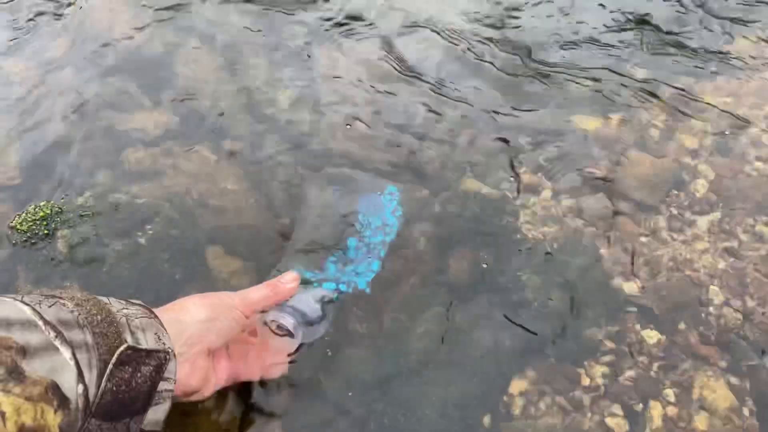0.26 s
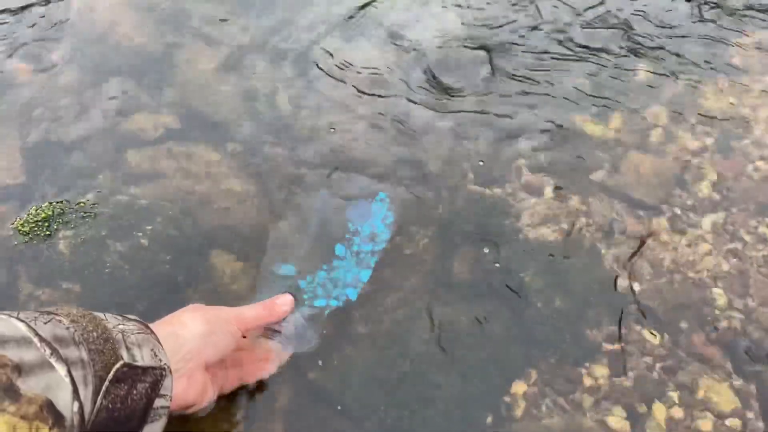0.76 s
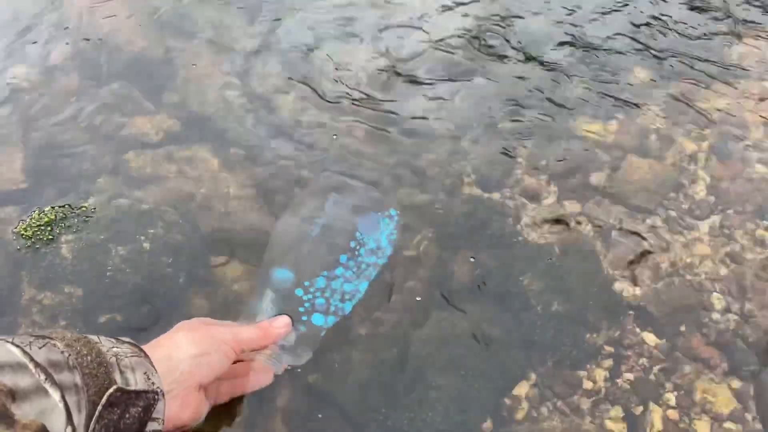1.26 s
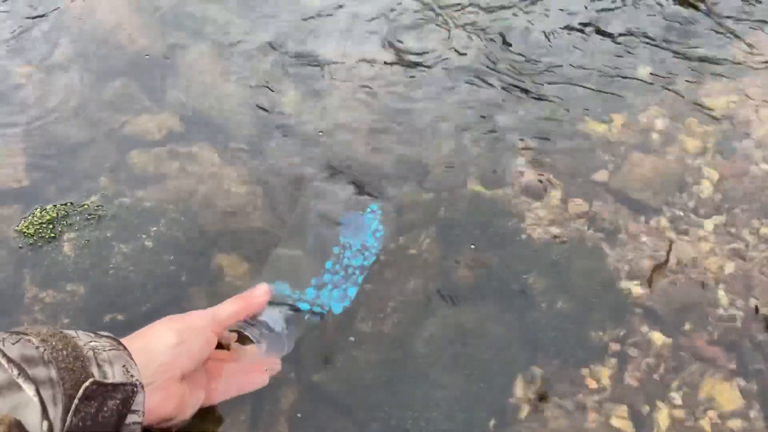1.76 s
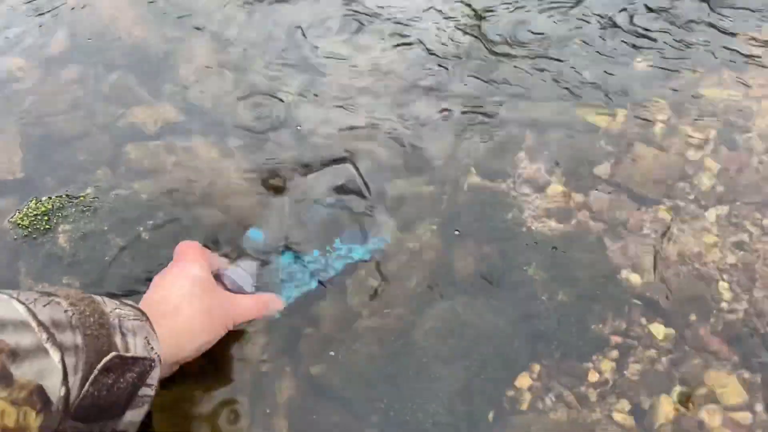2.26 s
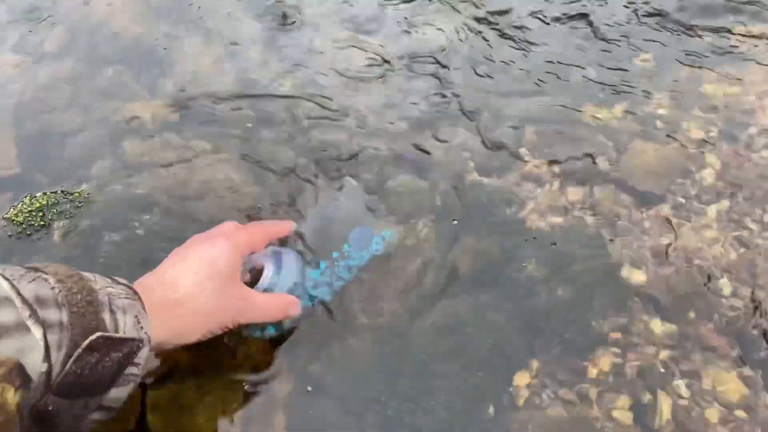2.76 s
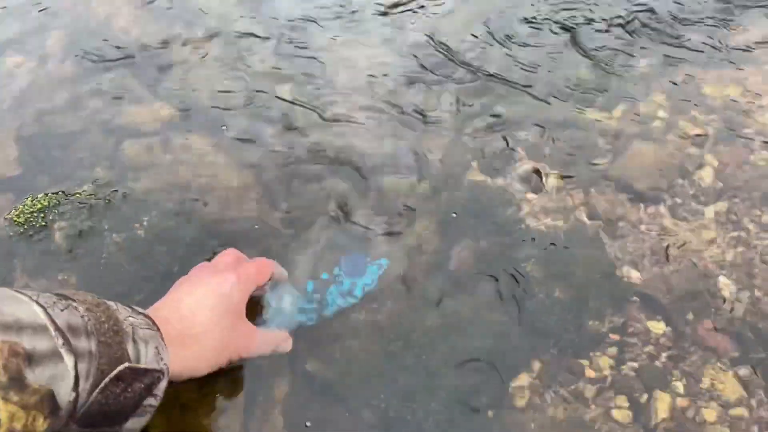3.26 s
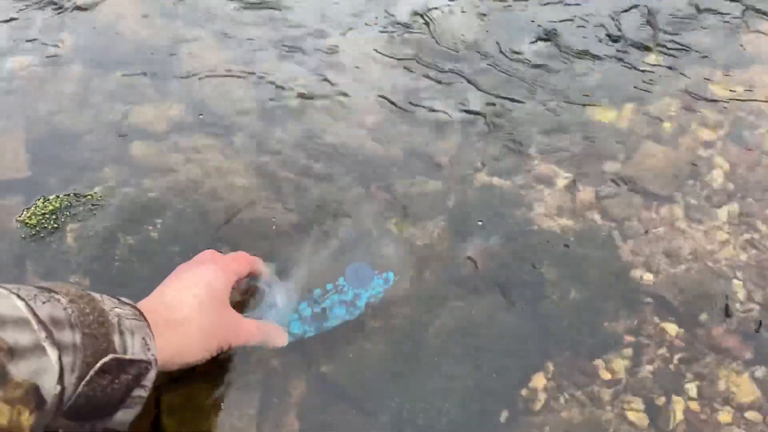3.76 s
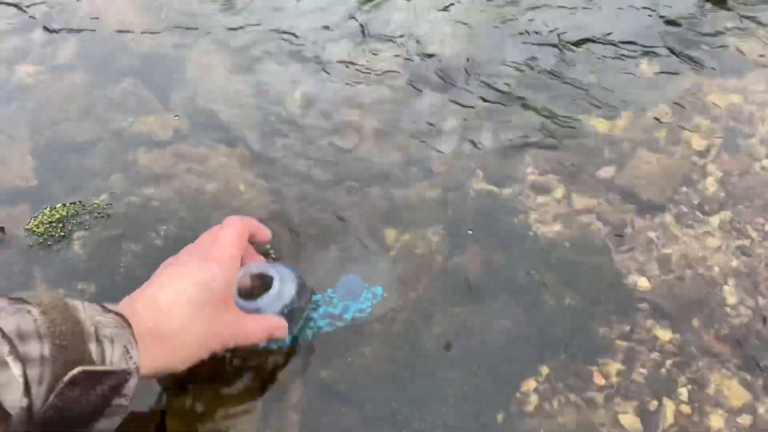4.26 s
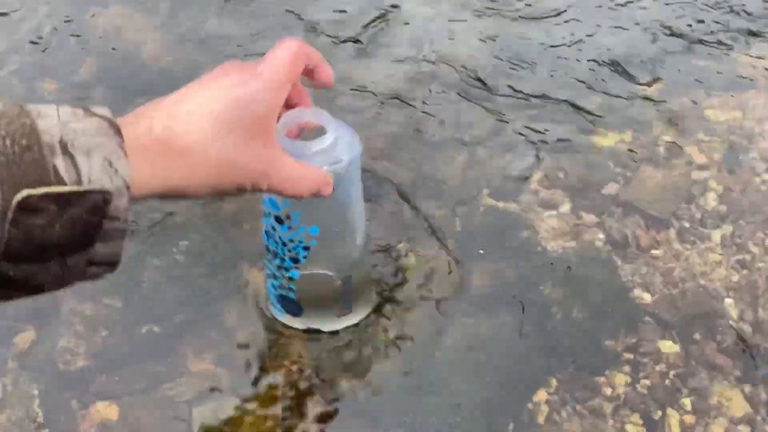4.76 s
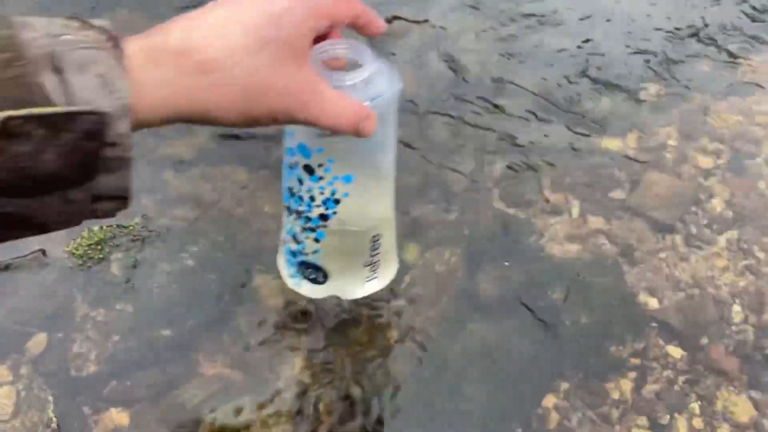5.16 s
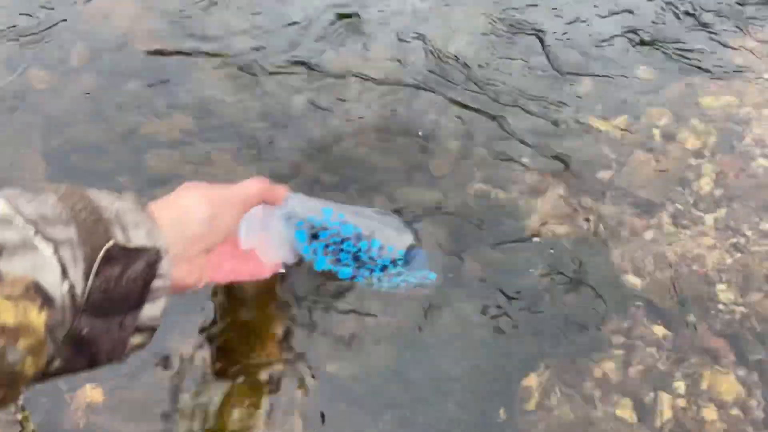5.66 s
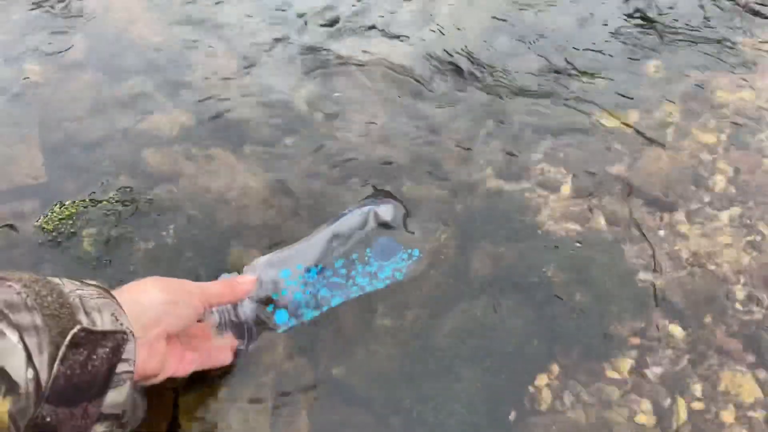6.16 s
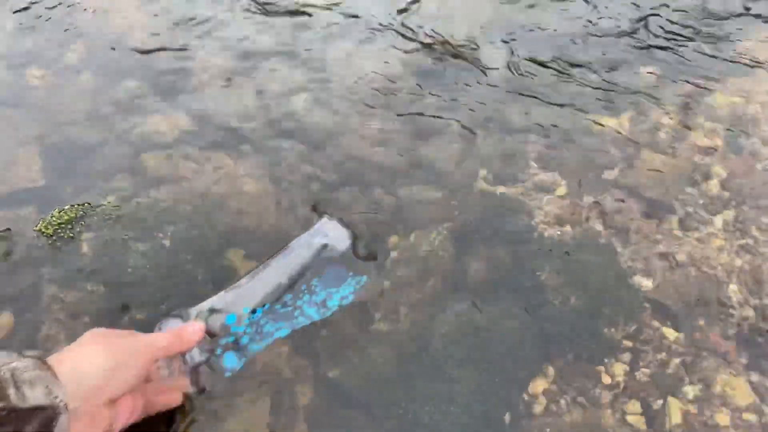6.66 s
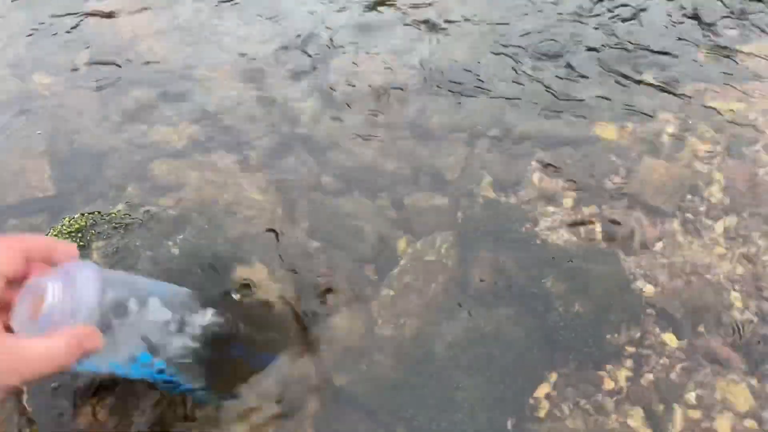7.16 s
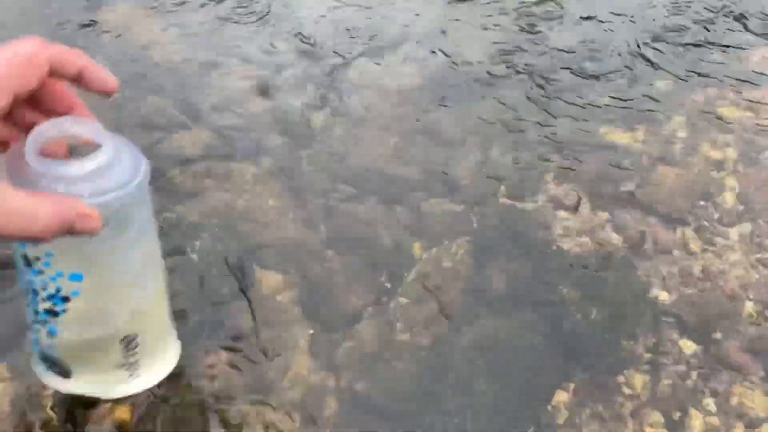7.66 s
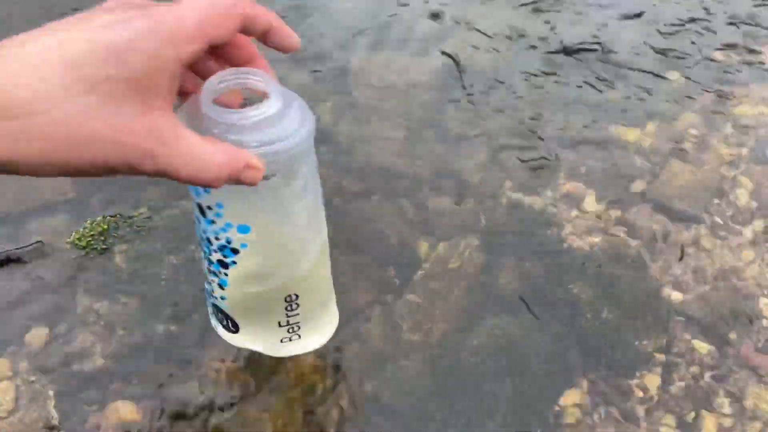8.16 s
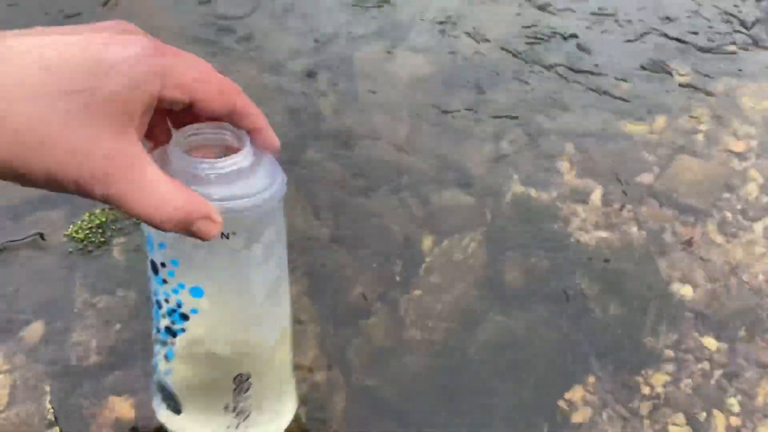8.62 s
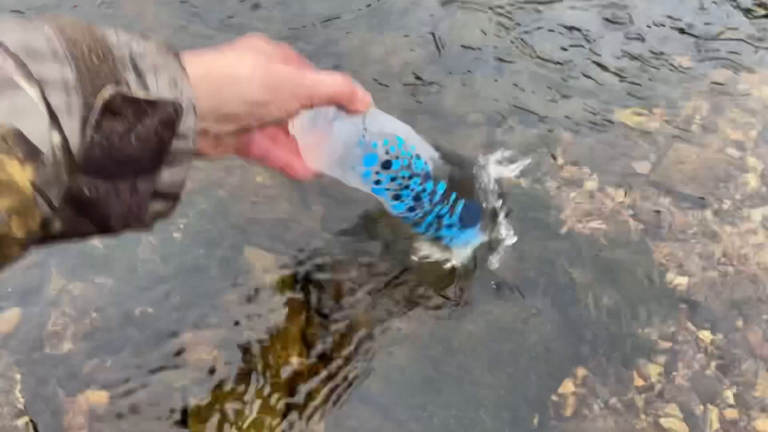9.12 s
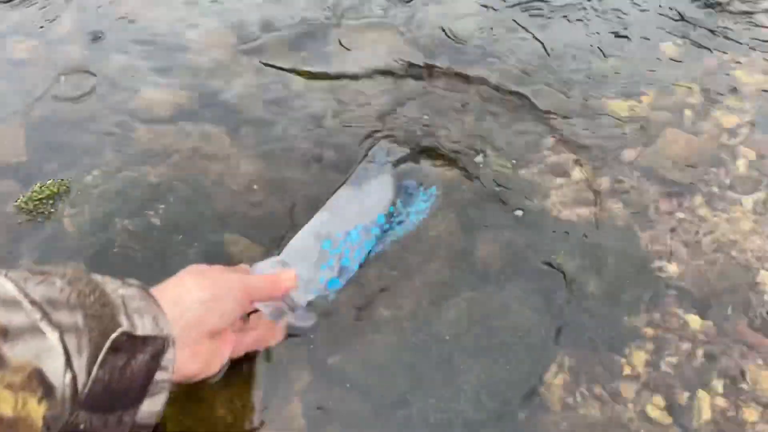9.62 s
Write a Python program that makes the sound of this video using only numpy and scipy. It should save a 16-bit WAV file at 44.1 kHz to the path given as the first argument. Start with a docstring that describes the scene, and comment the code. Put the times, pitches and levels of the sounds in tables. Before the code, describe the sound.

Water babbles over stones, with small splashes and bubbles from a dipped flask, gusty wind rumble and an early thump on the microphone.

```python
"""Dipping a flask in a brook

A shallow brook hisses and gurgles over stones, the ringing of countless bubbles. Close to a
two-port microphone a soft flask is dipped, lifted dripping and dipped again: drops, bubbles, spray.
Wind buffets the microphone and two knocks land on it; the first makes the limiter duck the water."""
import sys
import numpy as np
from scipy import signal
from scipy.fft import rfft, irfft, next_fast_len
from scipy.io import wavfile
from scipy.ndimage import uniform_filter1d, minimum_filter1d

SR = 44100
rng = np.random.default_rng(int(sys.argv[2]) if len(sys.argv) > 2 else 0)


def output_pcm(signal):
    """Save a mono or channel-first signal as 16-bit PCM at the path in sys.argv[1].

    Samples are clipped to [-1, 1] before scaling.
    """
    pcm = np.clip(np.atleast_2d(signal).T, -1, 1) * 32767
    wavfile.write(sys.argv[1], SR, np.round(pcm).astype(np.int16))


N = 436149
TIME = np.arange(N) / SR
FFT_SIZE = next_fast_len(N + 8192, True)
HZ = np.fft.rfftfreq(FFT_SIZE, 1 / SR)


def gain_of(db):
    """Decibels to a factor."""
    return 10 ** (np.asarray(db) / 20)


def unit_rms(x):
    """Scales to rms 1."""
    return x / np.sqrt(np.mean(x ** 2) + 1e-20)


def over_hz(points):
    """Joins rows of (freq_hz, value) on a log frequency axis."""
    hz, value = np.transpose(points)
    return np.interp(np.log(HZ + 1), np.log(hz + 1), value)


def filtered(x, response):
    """Applies a frequency response."""
    return irfft(rfft(x, FFT_SIZE) * response, FFT_SIZE)[..., :N]


def add(mix, start_s, sound):
    """Mixes a sound in at its time."""
    part = mix[..., round(start_s * SR):][..., :sound.shape[-1]]
    part += sound[..., :part.shape[-1]]


def drift(per_s):
    """A random wander of rms 1."""
    knots = rng.standard_normal(4000)
    return unit_rms(np.interp(TIME * per_s, np.arange(len(knots)), knots))


def held(start_s, length_s, rise_s, fall_s):
    """An envelope 0-1: rises, holds, and falls once its length has passed."""
    age_s = TIME - start_s
    return np.clip(age_s / rise_s, 0, 1) * np.clip(1 - (age_s - length_s) / fall_s, 0, 1)


def clicks(per_s, spread_db):
    """Random impulses, many small and a few large."""
    train = np.zeros(N)
    when, size, polarity = rng.random((int(per_s * N / SR) + 1, 3)).T
    height = gain_of(spread_db * np.minimum(-np.log(1 - size), 4))
    train[(when * N).astype(int)] = height * np.sign(polarity - .5)
    return train


def bubble(hz, cycles, glide_octaves):
    """A pocket of air rings briefly; its pitch glides as it nears the surface."""
    t60 = cycles / hz
    t = np.arange(int(t60 * SR) + 2) / SR
    turns = np.cumsum(hz * 2 ** (glide_octaves * t / t60)) / SR
    envelope = (1 - np.exp(-turns / 1.47)) * np.exp(-np.log(1000) * t / t60)
    return envelope / envelope.max() * np.sin(2 * np.pi * turns)


def babble(low_hz, high_hz, per_s, spread_db, cycles, share, sizes=20):
    """Swarms of bubbles take a share of their band from the hiss of countless smaller ones."""
    swarm = np.zeros(N)
    for hz in np.geomspace(low_hz, high_hz, sizes) * rng.uniform(.96, 1.04, sizes):
        ring = bubble(hz, cycles, glide_octaves=0.22)
        swarm += signal.oaconvolve(clicks(per_s / sizes, spread_db), ring * hz)[:N]
    band = (HZ > low_hz) & (HZ < high_hz)
    hiss = filtered(rng.standard_normal(N), np.sqrt(1 - share * band))
    return hiss + unit_rms(swarm) * np.sqrt(share * (high_hz - low_hz) / (SR / 2))


# Phase of the water between the microphone's two ports: freq_hz, left_lead_rad
PORT_PHASE = [(0, 1), (520, -2.4), (1550, -3.3), (1890, -6.2), (2840, -6.5), (3190, -8.8), (3700, -9.4),
              (3960, -11.5), (4390, -12.0), (5080, -12.4), (5770, -14.7), (6290, -12.7), (6630, -12.6),
              (7670, -15.6), (8870, -15.8), (10400, -18.7), (13000, -19.0), (13500, -21.4), (13900, -21.9),
              (16100, -22.0)]
# How alike the water sounds at the two ports: freq_hz, likeness (0-1)
PORT_LIKENESS = [(100, 0.083), (1000, 0.61), (1500, 0.79), (2400, 0.77), (5000, 0.57), (5800, 0.19),
                 (7000, 0.98), (8300, 1), (9800, 0.88), (11000, 1), (13300, 0.84), (14500, 1)]


def ports(source, colour, left_db):
    """Two draws of a source make a stereo pair of rms 1, partly alike and shifted in phase."""
    likeness = over_hz(PORT_LIKENESS)
    mid = rfft(source(), FFT_SIZE) * np.sqrt(1 + likeness)
    side = rfft(source(), FFT_SIZE) * np.sqrt(1 - likeness)
    left = (mid + side) * gain_of(left_db)
    right = (mid - side) * np.exp(-1j * over_hz(PORT_PHASE))
    spectra = np.array([left, right]) * gain_of(over_hz(colour))
    return unit_rms(irfft(spectra, FFT_SIZE)[:, :N])


# Colour of the riffle, far from the microphone: freq_hz, gain_db
WASH_COLOUR = [(30, -9), (130, -20.5), (220, 4), (350, -8), (800, -2.5), (1020, -4.5), (1300, -4.5),
               (1500, -3.5), (1750, -6.5), (2700, -10.5), (3400, -16), (4400, -14.5), (6000, -22.5),
               (7000, -22.5), (9500, -25), (12000, -35), (15200, -28.5)]


def wash():
    """The far riffle: a steady hiss of tiny bubbles."""
    water = ports(lambda: babble(1100, 5540, per_s=1300, spread_db=3, cycles=68, share=0.64, sizes=36),
                  WASH_COLOUR, left_db=0)
    return gain_of(-46 + .5 * drift(per_s=5)) * water


# Colour of the faint high ticks, with a gap near 8 kHz: freq_hz, gain_db
FIZZ_COLOUR = [(1000, -24), (2500, 3), (4500, 6), (7000, -1), (8300, -8), (10000, -4), (13000, -3),
               (15000, -20)]


def fizz(level_db=-66, decay_s=0.002):
    """Films of surface bubbles burst in faint, soft ticks, in loose clusters."""
    t = np.arange(512) / SR
    burst = rng.standard_normal(len(t)) * np.exp(-t / decay_s)
    ticks = ports(lambda: signal.oaconvolve(clicks(per_s=60, spread_db=4), burst)[:N],
                  FIZZ_COLOUR, left_db=1.5)
    return gain_of(level_db + 2.9 * drift(per_s=9)) * ticks


def plinks(low_hz, high_hz, per_s, base_db, cycles, spread_db):
    """Stray bubbles at the nearer stones stand out of the babble, each from its own direction."""
    out = np.zeros((2, N))
    for when, pitch, size, bearing, glide in rng.random((int(per_s * N / SR), 5)):
        start_s = when * N / SR
        hz = low_hz * (high_hz / low_hz) ** pitch
        size_db = spread_db * min(-np.log(1 - size), 3)
        tilt_db = -6 * np.log2(hz / low_hz)  # small, high bubbles are quieter
        ring = gain_of(base_db + size_db + tilt_db) * bubble(hz, cycles, 0.32 * glide)
        add(out[0], start_s, gain_of(2) * ring)
        add(out[1], start_s + 0.00048 * bearing, ring)
    return out


# Colour of the water running over the stones: freq_hz, gain_db
GURGLE_COLOUR = [(60, -40), (135, -14.5), (180, -0.5), (235, 3), (350, -5.5), (480, -2), (650, -5.5),
                 (870, -3.5), (1020, -21), (1500, -17), (2200, -34), (4000, -47)]
# Stretches where the low gurgle is turned down: start_s, length_s, depth_db
GURGLE_DUCKS = [(0.698, 0.92, 18.5), (8.16, 0.68, 3)]


def gurgle():
    """Larger bubbles fold under behind the stones, with rounder glugs; the level is turned down twice."""
    water = ports(lambda: babble(191.6, 963, per_s=240, spread_db=3.5, cycles=46.5, share=0.74),
                  GURGLE_COLOUR, left_db=1)
    glugs = plinks(416.6, 840, per_s=10, base_db=-7, cycles=59, spread_db=1.1)
    duck_db = sum(depth_db * held(start_s, length_s, rise_s=0.25, fall_s=0.28)
                  for start_s, length_s, depth_db in GURGLE_DUCKS)
    return gain_of(-39 - 0.13 * drift(per_s=2.6) - duck_db) * (water + glugs)


def brook():
    """Running water from far to near, with bright plinks that come and go."""
    bright = plinks(1651, 3000, per_s=38, base_db=-48, cycles=56, spread_db=1.9)
    return wash() + fizz() + gurgle() + gain_of(2.7 * drift(per_s=3.09)) * bright


def bass_lag(hz, turns=1.196, corner_hz=25):
    """The microphone passes bass later than treble, so each thump falls in pitch."""
    return np.exp(-2j * np.pi * turns * np.log(1 + hz / corner_hz))


def eddies(colour, per_s, spread_db, side_db):
    """Eddies strike both ports as a run of uneven puffs."""
    mid = clicks(per_s, spread_db)
    side = gain_of(side_db) * clicks(per_s, spread_db)
    response = gain_of(over_hz(colour)) * bass_lag(HZ)
    return unit_rms(filtered(np.array([mid + side, mid - side]), response))


def surges(depth_db, per_s):
    """The uneven strength of moving air, as a gain of rms 1."""
    return unit_rms(gain_of(depth_db * np.clip(drift(per_s), -2, 1)))


# Light breeze across the microphone: time_s, level_db
BREEZE = [(0, -48), (.9, -54.5), (1.3, -66.5), (2.3, -55.5), (2.95, -51.5), (3.5, -39), (5.05, -50),
          (6, -53), (7.4, -53.5), (8.3, -43.5), (9.88, -50.5)]
# Gusts right on the microphone: start_s, length_s, level_db, hardness (0 rumble, 1 flutter)
GUSTS = [(0.0, 0.19, -42.5, 0.01), (0.522, 0.2, -46, 0), (3.308, 0.077, -36.5, 0.02), (3.71, 0.15, -43, 0),
         (3.925, 0.18, -37, 0.03), (4.324, 0.068, -36.5, 0.08), (4.563, 0.1, -34.5, 0.03),
         (5.19, 0.052, -41, 0), (5.324, 0.36, -45, 0.04), (6.215, 0.076, -40.5, 0.02),
         (6.297, 0.4, -34, 0.01), (6.75, 0.17, -38, 0.02), (7.142, 0.16, -46, 0.1), (7.532, 0.2, -42, 0.26),
         (7.68, 0.045, -32, 0.24), (7.855, 0.086, -32.5, 0.14), (7.947, 0.083, -31.5, 0.55),
         (8.049, 0.13, -33, 0.4), (8.083, 0.025, -27, 0.75), (8.19, 0.022, -31, 0.05),
         (8.369, 0.08, -38.5, 0), (8.536, .22, -46, 0), (8.954, 0.071, -35, 0.28), (9.188, 0.83, -43, 0.07)]
# Colours of soft and of hard wind at the ports: freq_hz, gain_db
RUMBLE_COLOUR = [(15, -36), (30, -16), (55, 1.5), (80, 0), (130, -6.5), (220, -9), (400, -25), (900, -54),
                 (2000, -90)]
FLUTTER_COLOUR = [(40, -7), (130, -3), (300, -0.5), (500, -8.5), (800, -12.5), (1100, -25), (2000, -56),
                  (4000, -78)]


def wind():
    """A breeze rumbles on the microphone; gusts ride on it, and the hard ones flutter higher up."""
    soft_power = gain_of(np.interp(TIME, *np.transpose(BREEZE))) ** 2
    hard_power = np.zeros(N)
    for start_s, length_s, level_db, hardness in GUSTS:
        power = (gain_of(level_db) * held(start_s, length_s, rise_s=0.0074, fall_s=0.045)) ** 2
        soft_power += (1 - hardness) * power
        hard_power += hardness * power
    rumble = surges(3.5, per_s=22) * eddies(RUMBLE_COLOUR, per_s=300, spread_db=2, side_db=-9.5)
    flutter = surges(3, per_s=100) * eddies(FLUTTER_COLOUR, per_s=600, spread_db=4, side_db=-5)
    return np.sqrt(soft_power) * rumble + np.sqrt(hard_power) * flutter


# Splashes and drops off the flask, close by: start_s, peak_db, centre_hz, width_octaves, decay_s
SPLASHES = [(0.081, -28, 4270, 0.83, 0.0037), (0.094, -32.5, 5270, .6, .003), (0.103, -31.5, 8400, 1, .003),
            (1.338, -41, 13000, 0.38, 0.0018), (1.669, -37.5, 2800, 1, 0.0018),
            (2.898, -41.5, 7000, 0.56, .003), (2.982, -29, 5130, 0.61, .0025), (4.517, -48, 6800, .2, .002),
            (4.5864, -42, 8000, 0.67, .002), (4.596, -38, 11000, .25, .002),
            (4.6035, -33, 2500, 0.55, .002), (4.61, -26.5, 5400, 0.46, 0.0016),
            (4.615, -26.5, 5360, 0.25, 0.0017), (4.617, -39, 11800, .17, .003),
            (5.374, -29.5, 10200, 0.35, .002), (5.381, -39.5, 4800, .3, .002), (5.413, -40, 9500, .5, .003),
            (5.5, -40, 4230, 0.13, .004), (5.539, -35.5, 6450, 0.5, .004), (5.788, -30, 5730, 0.2, 0.0028),
            (5.796, -33, 5960, 0.28, 0.0033), (7.093, -40, 10000, 0.81, 0.0033),
            (7.188, -45, 9000, 0.94, 0.0028), (8.034, -34.5, 4800, 0.99, 0.0022),
            (8.11, -42, 4000, 1, .003), (9.0683, -38, 4000, 0.84, 0.0026), (9.177, -34, 1900, 0.68, 0.01),
            (9.179, -28, 7000, 0.064, 0.0018), (9.187, -37, 5900, 0.25, 0.0016),
            (9.191, -39, 5900, 0.22, 0.0021), (9.212, -37, 5700, 0.21, 0.0024),
            (9.2092, -27, 2300, 0.37, 0.0028), (9.217, -24, 2600, 0.87, 0.00065),
            (9.297, -36.5, 3800, 0.12, .003), (9.317, -38, 4300, 0.95, 0.0068),
            (9.33, -45, 10500, 0.35, 0.008)]


def splashes(stereo_width=0.64, rise_share=0.23, size=2048):
    """Drops and slaps of water: each a short crackling burst."""
    out = np.zeros((2, N))
    t, hz = np.arange(size) / SR, np.fft.rfftfreq(size, 1 / SR)
    lead = size // 32
    for start_s, peak_db, centre_hz, width_octaves, decay_s in SPLASHES:
        grains = rng.standard_normal((2, size)) * np.exp(0.65 * rng.standard_normal(size))
        grains *= (1 - np.exp(-t / (rise_share * decay_s))) * np.exp(-t / decay_s)
        band = np.exp(-.5 * (np.log2((hz + 1) / centre_hz) / width_octaves) ** 2)
        mid, side = irfft(rfft(np.roll(grains, lead, axis=1)) * band)
        burst = np.array([mid + stereo_width * side, mid - stereo_width * side]) / abs(mid).max()
        add(out, start_s - lead / SR, gain_of(peak_db) * burst)
    return out


def add_thump(mix, start_s, peak_db, hz, spectrum):
    """Mixes in a pressure pulse on the microphone, its bass lagging."""
    pulse = irfft(spectrum * bass_lag(hz))
    lead = pulse.shape[-1] // 8
    pulse = np.roll(pulse, lead, axis=-1)
    add(mix, start_s - lead / SR, gain_of(peak_db) * pulse / abs(pulse).max())


def rocking(pitch_hz=52, t60=0.12):
    """The low tail of a knock: a slow rocking that dies away."""
    t = np.arange(SR // 4) / SR
    envelope = (1 - np.exp(-2 * pitch_hz * t)) * np.exp(-np.log(1000) * t / t60)
    return envelope * np.sin(2 * np.pi * pitch_hz * t)


# Knocks on the microphone itself:
# start_s, peak_db, corner_hz, steepness, tick_db, ring (0-1), right_ring_cut_db
KNOCKS = [(0.41, 9.5, 328, 4.23, -61, 0.81, 16), (1.0639, -21, 1210, 12, -30, 0.17, 17)]
# Narrow bands that ping around each knock, louder on the left: centre_hz, width_hz, lift_db
KNOCK_RING_BANDS = [(1810, 160, 22), (2370, 970, 18.5), (5600, 950, 20.5)]


def knocks(hollow_hz=1080, hollow_db=-6, low_cut_hz=50):
    """Blunt blows: soft contact dulls the treble; narrow bands ping around each, louder on the left."""
    out, hz = np.zeros((2, N)), np.fft.rfftfreq(8192, 1 / SR)
    bands = sum(gain_of(lift_db) / (1 + (2 * (hz - centre_hz) / width_hz) ** 2)
                for centre_hz, width_hz, lift_db in KNOCK_RING_BANDS)
    bass_cut = (hz / (hz - 1j * low_cut_hz)) ** 2
    for start_s, peak_db, corner_hz, steepness, tick_db, ring, right_ring_cut_db in KNOCKS:
        blunt = bass_cut / np.sqrt(1 + (hz / corner_hz) ** steepness)
        contact = (blunt + gain_of(tick_db)) / (1 + (hz / 7200) ** 8)
        hollow = gain_of(ring * hollow_db * np.exp(-((hz - hollow_hz) / 330) ** 2))
        ping = 1 + ring * bands * gain_of([[0], [-right_ring_cut_db]])
        add_thump(out, start_s, peak_db, hz, contact * hollow * ping)
        add(out, start_s + 0.018, gain_of(peak_db - 29) * rocking())
    return out


# Bubbles at the flask, close to the microphone: start_s, level_db, pitch_hz, ring_cycles, glide_octaves
FLASK_BUBBLES = [(0.654, -34, 234, 72, -1.9), (2.169, -36, 2270, 57, -0.027), (2.189, -33, 2240, 67, 0.14),
                 (2.899, -37, 1250, 18, -1.3), (2.901, -30, 557, 13, -0.9), (2.979, -24.5, 920, 17, -0.66),
                 (2.984, -31.5, 2620, 44, -0.4), (3.091, -36, 1850, 35, 0.1), (3.245, -37, 510, 120, 0.85),
                 (4.516, -32.5, 557, 32, 0.074), (4.603, -32, 1740, 57, -0.085),
                 (4.617, -33.5, 1650, 63, 0.22), (5.447, -28.5, 986, 23, -1.4),
                 (5.985, -33.5, 1150, 15, -0.36), (5.985, -28.5, 617, 14, -1.1),
                 (7.088, -32.5, 537, 73, 0.76), (7.11, -30, 474, 19, -0.9), (7.374, -32.5, 895, 15, -0.063),
                 (7.802, -36, 830, 110, 0.055), (8.005, -33, 2500, 35, -0.051),
                 (8.034, -28.5, 3310, 50, -0.29), (8.112, -34, 2350, 25, 0.2), (8.192, -38, 1980, 45, 0.1),
                 (8.992, -32, 840, 19, -0.63), (9.02, -35, 574, 53, .1), (9.069, -29, 1400, 8.5, 1.5),
                 (9.125, -35.5, 556, 72, 0.095), (9.152, -32.5, 720, 33, 0.8), (9.176, -31, 1400, 24, -0.4),
                 (9.1805, -28, 2600, 28, 0.13), (9.191, -30, 865, 49, 1.9), (9.211, -33, 2700, 46, 0),
                 (9.218, -28, 1940, 78, -0.62), (9.45, -32.5, 545, 55, 0.29)]


def gulps(left_db=-1.5, right_db=-1):
    """Single bubbles ring around the mouth of the flask."""
    out = np.zeros((2, N))
    for start_s, level_db, pitch_hz, ring_cycles, glide_octaves in FLASK_BUBBLES:
        ring = gain_of(level_db) * bubble(pitch_hz, ring_cycles, glide_octaves)
        add(out[0], start_s, gain_of(left_db) * ring)
        add(out[1], start_s + .0001, gain_of(right_db) * ring)  # the far port hears it later
    return out


# The strongest buffets of wind, alike at both ports: start_s, level_db, low_hz, high_hz
BUFFETS = [(3.327, -27, 45, 200), (3.346, -25, 45, 190), (3.387, -23, 45, 149), (3.514, -29.5, 45, 160),
           (3.677, -28, 45, 160), (3.734, -30, 45, 110), (3.789, -31, 45, 110), (3.945, -26, 150, 242),
           (4.004, -26, 45, 120), (4.374, -30, 45, 160), (4.596, -28, 45, 150), (4.627, -29, 45, 149),
           (4.715, -24.5, 45, 150), (4.865, -26.5, 45, 132), (5.229, -28, 45, 110), (5.414, -30, 45, 150),
           (6.303, -18, 145, 213), (6.327, -23, 40, 85), (6.347, -22, 45, 150), (6.418, -26, 60, 190),
           (6.431, -19, 45, 105), (6.497, -26, 80, 180), (6.567, -21.5, 45, 125), (6.634, -26, 90, 270),
           (6.665, -22.5, 45, 125), (6.779, -28.5, 45, 120), (6.87, -20.5, 60, 150), (7.157, -30, 45, 150),
           (7.254, -35, 45, 150), (7.64, -29, 120, 378), (7.659, -27, 90, 260), (7.69, -20, 150, 420),
           (7.698, -16.5, 70, 280), (7.73, -17.5, 100, 430), (7.734, -17, 55, 170),
           (7.7426, -11.5, 80, 440), (7.844, -24, 100, 418), (7.875, -22, 90, 476), (7.913, -23, 90, 480),
           (7.9543, -17, 120, 513), (7.979, -22, 150, 520), (8.004, -23, 140, 560),
           (8.063, -18.5, 130, 616), (8.085, -22, 130, 520), (8.0973, -16, 120, 654),
           (8.103, -15, 130, 554), (8.117, -22, 150, 680), (8.136, -27, 200, 620), (8.148, -18, 60, 190),
           (8.1637, -15.5, 200, 640), (8.168, -16.5, 220, 700), (8.19, -26, 150, 500),
           (8.196, -17, 55, 150), (8.211, -26.5, 110, 460), (8.405, -25, 45, 120), (8.561, -29.5, 125, 190),
           (8.691, -29, 65, 120), (8.963, -26.5, 65, 170), (9.006, -28.5, 120, 220), (9.062, -32, 55, 140),
           (9.229, -26, 90, 260), (9.421, -31.5, 60, 120), (9.546, -27.5, 90, 190), (9.56, -29, 55, 120),
           (9.6, -36, 40, 90), (9.845, -31, 55, 119)]


def buffets(trim_db=-0.64, wake_db=-4, wake_s=0.0078, size=8192):
    """Single eddies thump the microphone, large ones low, small ones higher; a ragged wake follows."""
    out = np.zeros(N)
    t, hz = np.arange(size) / SR, np.fft.rfftfreq(size, 1 / SR)
    for start_s, level_db, low_hz, high_hz in BUFFETS:
        wake = rng.standard_normal(size) * t * np.exp(-2 * t / wake_s)
        ragged = 1 + gain_of(wake_db) * rfft(wake / np.linalg.norm(wake))
        band = hz ** 3 / (hz ** 3 + low_hz ** 3) / (1 + (hz / high_hz) ** 6.5)
        add_thump(out, start_s, level_db + trim_db, hz, ragged * band)
    return out


# Spray and dribble close by, as the flask leaves or enters the water: start_s, end_s, level_db
SPRAYS = [(4.49, 4.768, -52.5), (4.992, 5.294, -56.5), (5.297, 5.66, -56), (5.72, 5.85, -52),
          (7.04, 7.333, -53), (9.14, 9.44, -54.5)]
# Colour of that spray: freq_hz, gain_db
SPRAY_COLOUR = [(1000, -28), (2500, 5), (4500, 6), (7000, -0.5), (8300, -3), (10500, 0.5), (15500, -7)]


def spray():
    """Tiny droplets patter back into the brook."""
    patter = ports(lambda: babble(2900, 14000, per_s=300, spread_db=6.5, cycles=8.3, share=0.79,
                                  sizes=16), SPRAY_COLOUR, left_db=-0.5)
    swell = sum(gain_of(level_db) * np.sin(np.pi * np.clip((TIME - start_s) / (end_s - start_s), 0, 1))
                for start_s, end_s, level_db in SPRAYS)
    return patter * swell


def scene():
    """Brook, wind, flask and knocks as they reach the microphone."""
    return brook() + wind() + splashes() + knocks() + gulps() + buffets() + spray()


def record(dry, ceiling_db=-1.4, hold_s=0.079, recover_db_per_s=130, edge_hz=15850):
    """The recorder's look-ahead limiter ducks, holds and recovers; a low-pass cuts the top treble."""
    over_db = np.maximum(20 * np.log10(abs(dry).max(0) + 1e-9) - ceiling_db, 0)
    span = 2 * int(hold_s * SR / 2) + 1
    held_db = -minimum_filter1d(-over_db, span, origin=span // 2)
    recovery_db = TIME * recover_db_per_s
    duck_db = np.maximum.accumulate(held_db + recovery_db) - recovery_db
    ahead_db = uniform_filter1d(-minimum_filter1d(-duck_db, size=500), size=200)
    low_pass = signal.firwin(511, edge_hz, window=("kaiser", 9), fs=SR)
    return signal.oaconvolve(dry * gain_of(-ahead_db), low_pass[None], "same", axes=1)


dry = scene()
out = record(dry)
output_pcm(out)
```